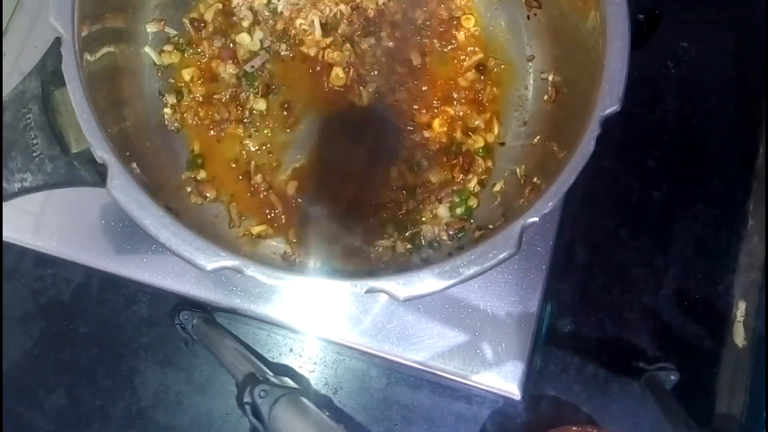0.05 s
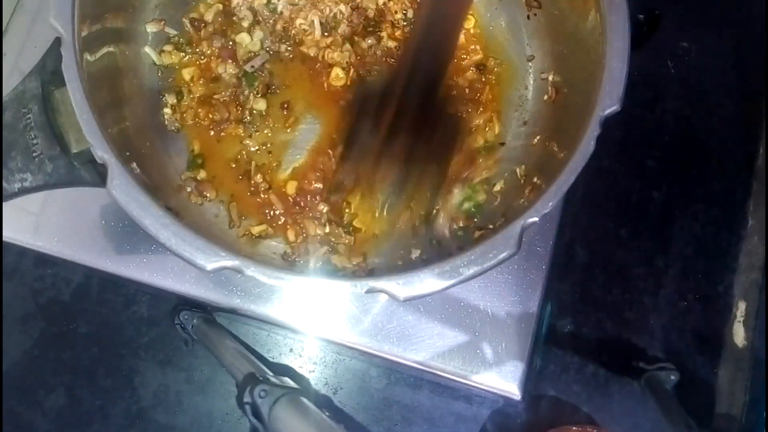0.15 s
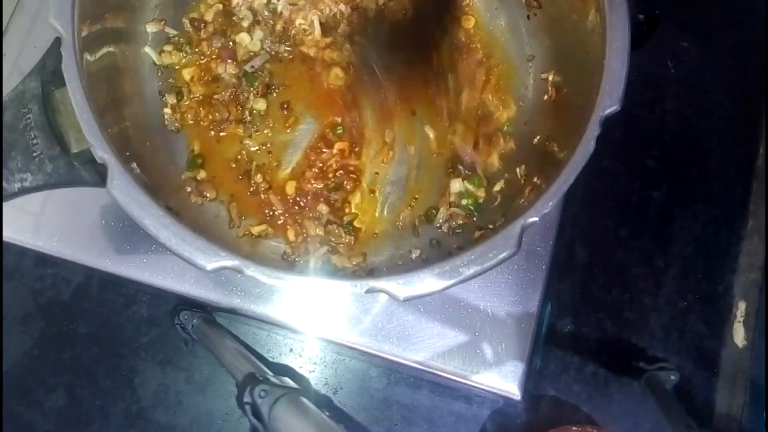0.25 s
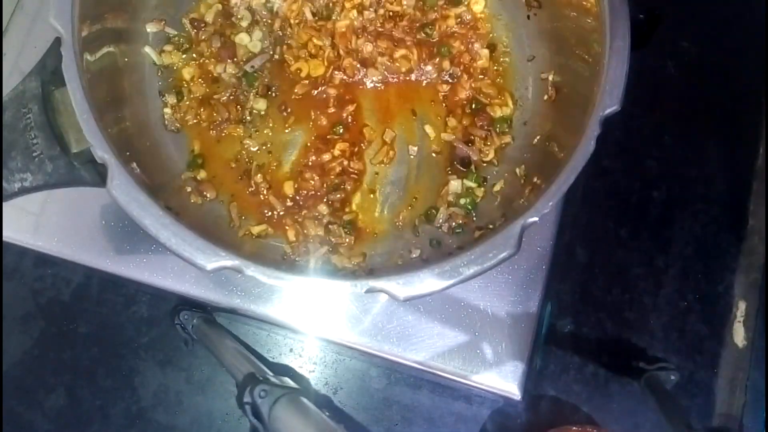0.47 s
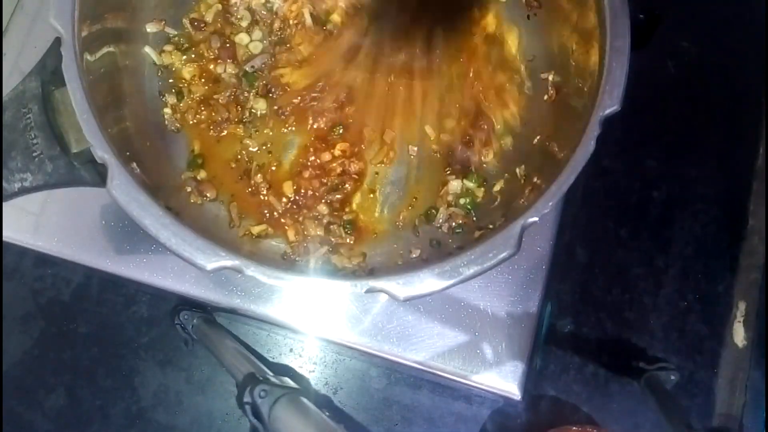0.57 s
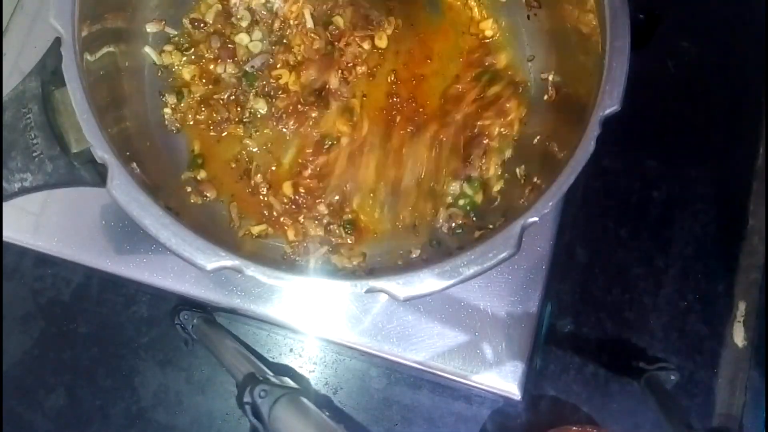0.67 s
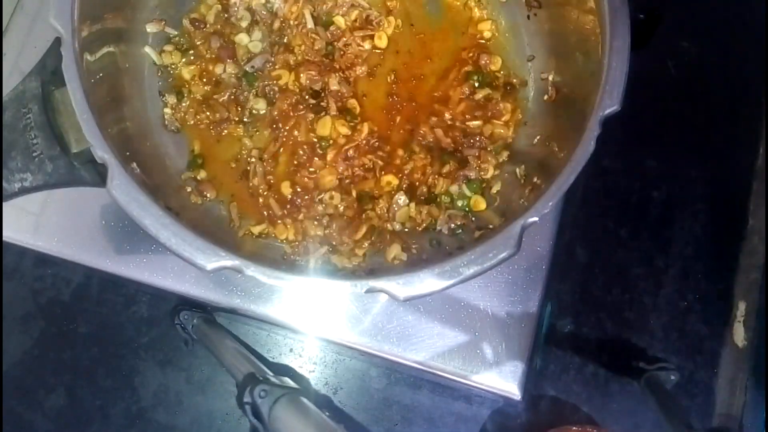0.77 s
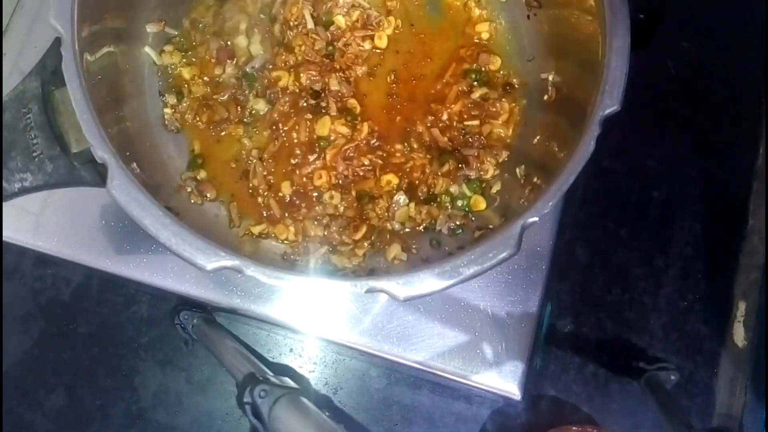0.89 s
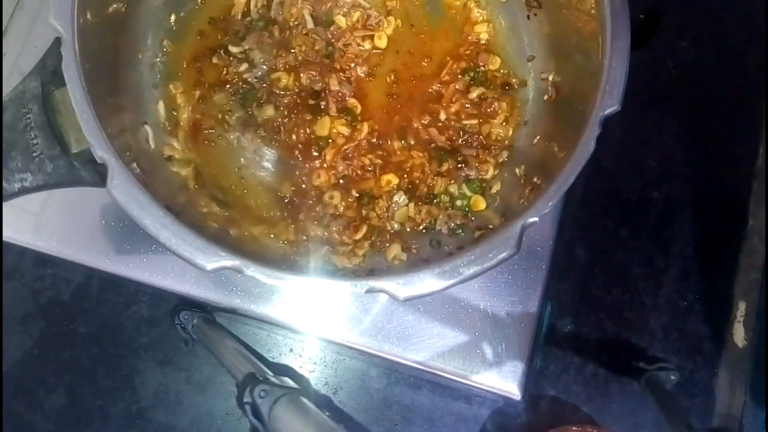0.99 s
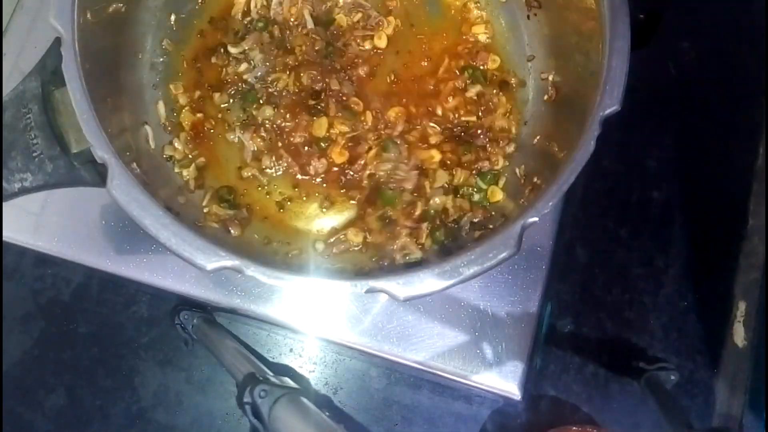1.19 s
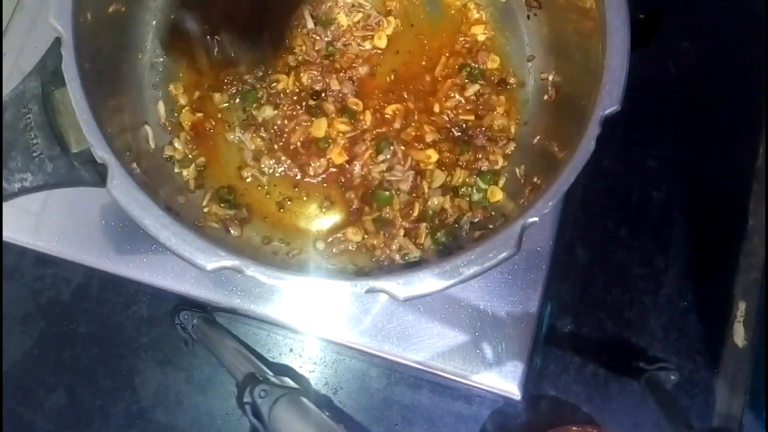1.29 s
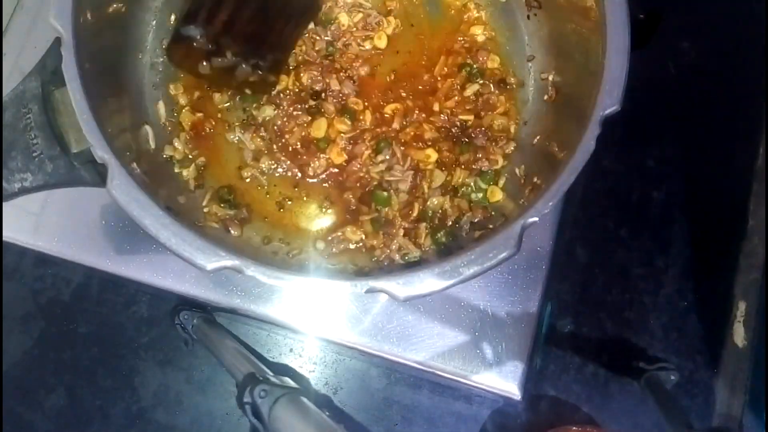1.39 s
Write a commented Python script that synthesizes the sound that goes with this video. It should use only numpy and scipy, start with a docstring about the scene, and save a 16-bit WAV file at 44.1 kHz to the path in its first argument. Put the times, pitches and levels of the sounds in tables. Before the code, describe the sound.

Food sizzles in hot oil while a wooden spatula scrapes and knocks a metal pot.

```python
"""Chopped aromatics sizzle in hot oil in a thick metal pot over a low burner; mono, from just above.
At 0.22 s a wooden spatula lands in the food with a click and pushes it across the bottom, scraping.
At 0.58 s it knocks hard against the wall: the pot's modes ring and its deep boom swells.
From about 0.95 s it stirs again. Short bright ticks after the landing click are oil spits.
A small kitchen answers spits and contacts."""
import sys
import numpy as np
from scipy import signal
from scipy.fft import rfft, irfft, next_fast_len
from scipy.io import wavfile
from scipy.ndimage import map_coordinates

SR = 44100
rng = np.random.default_rng(int(sys.argv[2]) if len(sys.argv) > 2 else 0)


def pcm_store(signal):
    """Save signal as 16-bit PCM."""
    levels = np.round(np.clip(np.atleast_2d(signal), -1, 1) * 32767)
    wavfile.write(sys.argv[1], SR, levels.astype(np.int16).T)


N = 63945

# spatula blows: start_s, ring_db, crack_db, centre_hz, width_oct, boom_db, boom_hz, build_s, free_s
BLOWS = [(0.2272, -40.5, -27, 628, 0.64, -32.5, 226.7, 0.0026, 0.043),
         (0.5756, -24, -15, 1500, 3.2, -22.5, 238, 0.086, 0.28)]
# pot modes: pitch_hz, relative_db, t60_s
POT_MODES = [(386, 1, 0.31), (583, -5, 0.17), (659.5, 1.5, 0.15), (807, -16, 0.33), (900, -7.5, 0.3),
             (1040, -8, 0.12), (1062, -8, 0.42), (1330, -12, 0.15), (1453, -6, 0.23), (1547.4, -10, 0.25),
             (2312.6, -13, 0.31), (2762, -8, 0.087), (3380, -3.5, 0.21), (3505, -9, 0.22), (4102, -1, 0.06),
             (4490, -8.5, 0.21), (4775, -12, 0.14), (4860, -3.5, 0.25), (4897, -3.5, 0.26),
             (5320, -8, 0.16)]
# stove shaking under the pot: freq_hz, relative_db
STOVE_SPECTRUM = [(25, -23), (55, -13), (85, 15.5), (125, -4), (190, 3), (400, -43)]


def amp(db):
    """Decibels to gain."""
    return 10 ** (np.asarray(db) / 20)


def unit(x):
    """Scale to rms 1."""
    return x / np.sqrt(np.mean(x ** 2) + 1e-20)


def along(points, hz):
    """Interpolate (freq_hz, value) points on a log axis."""
    freq_hz, values = np.transpose(points)
    return np.interp(np.log(hz + 1), np.log(freq_hz + 1), values)


def hump(hz, centre_hz, width_oct):
    """Soft peak on a log-frequency axis."""
    return 1 / (1 + (np.log2((hz + 1) / centre_hz) / width_oct) ** 2)


def since(start_s):
    """Seconds since start_s, zero before."""
    return np.maximum(np.arange(N) / SR - start_s, 0)


def wobble(knots_per_s):
    """Smooth random curve."""
    knots = rng.standard_normal(int(N * knots_per_s / SR) + 4)
    return map_coordinates(knots, [np.arange(N) * knots_per_s / SR])


def filtered(x, response):
    """Apply the gain response(hz)."""
    size = next_fast_len(N + SR // 2)
    return irfft(rfft(x, size) * response(np.fft.rfftfreq(size, 1 / SR)), size)[..., :N]


def coloured(x, spectrum):
    """Shape x by (freq_hz, relative_db) points; rms 1."""
    return unit(filtered(x, lambda hz: amp(along(spectrum, hz))))


def noise(spectrum):
    """Coloured noise, rms 1."""
    return coloured(rng.standard_normal(N), spectrum)


def grains(per_s, spread_db):
    """Random impulses, many weak, few strong; rms 1."""
    size = amp(spread_db * np.minimum(rng.exponential(size=N), 6))
    return unit((rng.random(N) < per_s / SR) * size * rng.choice([-1, 1], N))


def tone(hz, t, wander_rad):
    """Mode with wandering phase, rms 1."""
    return np.sqrt(2) * np.sin(2 * np.pi * hz * t + wander_rad * wobble(30.12))


def burner():
    """Steady rumble of burner and room."""
    # rumble: freq_hz, relative_db
    spectrum = [(30, -27), (60, -8.5), (100, -4), (170, -8), (300, -17), (600, -13.5), (1200, -34)]
    return amp(-61.5) * noise(spectrum)


def sizzle():
    """Steam bubbles burst in the oil over an even hiss."""
    # frying oil: freq_hz, relative_db
    spectrum = [(200, -23), (600, -7.5), (900, -9.5), (1200, 0), (1550, -11), (1800, -3), (2200, -8),
                (2800, -4), (4000, -1.5), (5300, 1), (6500, -0.5), (7300, -10.5), (8100, -19),
                (11000, -18.5), (15500, -20)]
    # loudness contour: time_s, level_db
    contour = [(0, -47), (0.17, -46), (0.55, -46.5), (0.9, -45.5), (1.098, -44.5), (1.45, -45.5)]
    bubble_share, flutter_db = 0.36, 1
    bubbles = np.sqrt(bubble_share) * grains(per_s=3500, spread_db=2.5)
    hiss = np.sqrt(1 - bubble_share) * rng.standard_normal(N)
    level_db = np.interp(since(0), *np.transpose(contour)) + flutter_db * wobble(43.83)
    return amp(level_db) * coloured(bubbles + hiss, spectrum)


def click_and_spits():
    """Short bright ticks: the spatula's landing click, then oil spits as wet food meets hot metal."""
    # landing click, then oil spits: start_s, level_db, pitch_hz
    events = [(0.2238, -32.5, 5700), (0.4645, -61, 5500), (0.4920, -39, 5300), (1.0316, -37, 4300),
              (1.058, -34.5, 5400), (1.394, -43, 6550)]
    t60_s = 0.021
    out = np.zeros(N)
    for start_s, level_db, pitch_hz in events:
        t = since(start_s)
        band = unit(filtered(rng.standard_normal(N), lambda hz: hump(hz, pitch_hz, width_oct=0.24)))
        out += (t > 0) * amp(level_db - 60 * t / t60_s) * band
    return out


def tick(t):
    """Bright first contact of wood on metal."""
    # contact noise: freq_hz, relative_db
    spectrum = [(500, -14), (2000, 6), (5500, 13), (8000, -18), (15000, -17)]
    level_db, t60_s = -6, 0.019
    return (t > 0) * amp(level_db - 60 * t / t60_s) * noise(spectrum)


def clang(t):
    """A crack, then a wash of dense modes; treble dies first."""
    # crack and dense modes: freq_hz, relative_db
    spectrum = [(100, -17), (250, 5), (480, 2.5), (640, 0), (770, -20), (1050, 9), (1200, -12), (1480, 6),
                (1900, -23), (2300, 1.5), (2850, 0.5), (3150, -1), (3400, -25), (3800, -0.5), (5300, 5),
                (6800, -2), (8200, -16.5), (15000, -29)]
    # dense-mode decay: freq_hz, t60_s
    decay = [(300, 0.54), (1400, 0.36), (4500, 0.32), (10000, 0.26)]
    wash_db, crack_t60_s = -10, 0.054
    hz, frame_s, bins = signal.stft(rng.standard_normal(N), SR, nperseg=256)
    bins = bins * unit(amp(along(spectrum, hz)))[:, None]
    bins *= amp(-60 * frame_s / along(decay, hz)[:, None])
    wash = signal.istft(bins, SR, nperseg=256)[1][np.round(t * SR).astype(int)]
    crack = noise(spectrum) * amp(-60 * t / crack_t60_s)
    return (t > 0) * (crack + amp(wash_db) * wash)


def spatula_blows():
    """The spot struck selects the modes; after free_s the resting spatula damps them. Returns ring, low."""
    mode_rise_s, mode_rise_hz, damping_db_per_s = 0.018, 380, 150
    beat_hz, beat_depth_db, beat_lag_s = 8.35, 5, 0.047
    boom_t60_s, choke_s, stove_db = 0.76, 0.024, -22.5
    ring, low = np.zeros(N), np.zeros(N)
    for start_s, ring_db, crack_db, centre_hz, width_oct, boom_db, boom_hz, build_s, free_s in BLOWS:
        t = since(start_s)
        damping_db = damping_db_per_s * since(start_s + free_s)
        for pitch_hz, mode_db, t60_s in POT_MODES:
            rise = 1 - np.exp(-t / (mode_rise_s * (mode_rise_hz / pitch_hz) ** 3))  # low modes lag
            envelope = rise * amp(ring_db + mode_db - 60 * t / t60_s - damping_db)
            ring += envelope * tone(pitch_hz, t, wander_rad=0.74) * hump(pitch_hz, centre_hz, width_oct)
        ring += amp(crack_db) * filtered(tick(t) + clang(t), lambda hz: hump(hz, centre_hz, width_oct))
        beat_db = beat_depth_db * np.cos(2 * np.pi * beat_hz * (t - beat_lag_s))
        build = 1 - np.exp(-t / build_s)
        choke = 0.5 - 0.5 * np.tanh((t - free_s) / choke_s)
        swing = amp(boom_db + beat_db - 60 * t / boom_t60_s) * build * choke
        low += swing * (tone(boom_hz, t, wander_rad=0.87) + amp(stove_db) * noise(STOVE_SPECTRUM))
    # keeps the knock's crack and ring free of low thud
    ring_highpass = signal.butter(3, 223, "high", fs=SR, output="sos")
    return signal.sosfilt(ring_highpass, ring), low


def spatula_strokes():
    """Swells of tiny slips rasp, rub the pot into ringing and shake the stove. Returns friction, low."""
    # pushes: peak_s, rise_s, fall_s, scrape_db, rasp_hz, boom_db, stove_db
    pushes = [(0.312, 0.055, 0.023, -49.5, 1110, -47, -56), (0.362, 0.033, 0.032, -44, 2240, -35.5, -51),
              (0.436, 0.0095, 0.06, -58.5, 1040, -45, -52), (0.966, 0.025, 0.02, -60, 3550, -42, -70),
              (1, 0.0069, .02, -74, 3500, -39.5, -48), (1.09, 0.061, 0.033, -48, 2980, -43.5, -63.5),
              (1.187, 0.031, 0.02, -46.5, 2000, -43, -59), (1.262, 0.056, 0.03, -80, 3400, -50.5, -54.5)]
    # wood dragging food over metal: freq_hz, relative_db
    spectrum = [(150, -1.5), (300, 7.5), (700, 1.5), (1100, -4.5), (1600, -1), (2200, -4.5), (3200, -3),
                (4500, 0), (6500, 1), (8200, -22.5), (15000, -20.5)]
    slips_per_s, spread_db = 1800, 2
    touch_db, rasp_db, ring_db, boom_hz = -56, -7.5, -11, 236.3
    t = since(0)
    landing_s = BLOWS[0][0]
    drag = amp(touch_db) * (t > landing_s)  # light rub between pushes
    swing, shake, rasp = np.zeros((3, N))
    slips = grains(slips_per_s, spread_db)
    for peak_s, rise_s, fall_s, scrape_db, rasp_hz, boom_db, stove_db in pushes:
        push = np.exp(-((t - peak_s) / np.where(t < peak_s, rise_s, fall_s)) ** 2)
        drag += amp(scrape_db) * push
        band = unit(filtered(slips, lambda hz: hump(hz, rasp_hz, width_oct=0.16)))
        rasp += amp(scrape_db + rasp_db) * push * band
        swing += amp(boom_db) * push
        shake += amp(stove_db) * push
    pot = sum(amp(db - 60 * t / t60_s) * np.sin(2 * np.pi * hz * t) for hz, db, t60_s in POT_MODES)
    ring = signal.fftconvolve(drag * slips, pot / np.linalg.norm(pot))[:N]
    low = swing * tone(boom_hz, t, wander_rad=1) + shake * noise(STOVE_SPECTRUM)
    scrape = drag * coloured(grains(slips_per_s, spread_db), spectrum)
    return scrape + rasp + amp(ring_db) * ring, low


def kitchen(x, t60_s=0.49, level_db=-8.5):
    """Short tail of a small hard room."""
    tail = rng.standard_normal(N) * amp(-60 * since(0) / t60_s)
    return amp(level_db) * signal.fftconvolve(x, tail / np.linalg.norm(tail))[:N]


def scene():
    """Oil, spatula and pot, alike in both channels."""
    ring, blow_low = spatula_blows()
    friction, stroke_low = spatula_strokes()
    contacts = ring + friction + click_and_spits()
    mono = burner() + sizzle() + contacts + kitchen(contacts) + blow_low + stroke_low
    return np.array([mono, mono])


def record(dry):
    """Microphone band limit."""
    top_hz = 15800
    return filtered(dry, lambda hz: hz < top_hz)


dry = scene()
out = record(dry)
pcm_store(out)
```